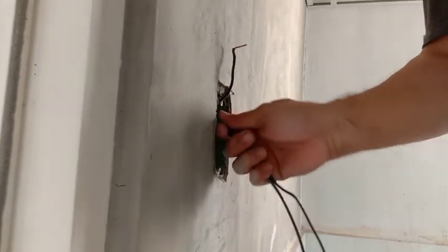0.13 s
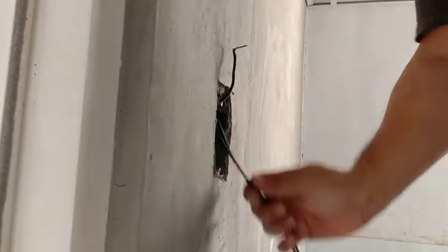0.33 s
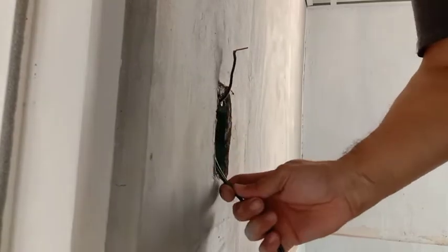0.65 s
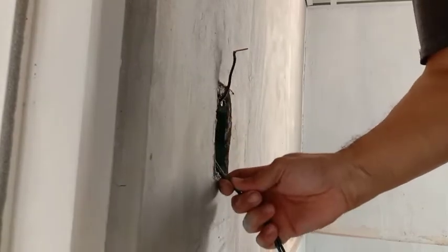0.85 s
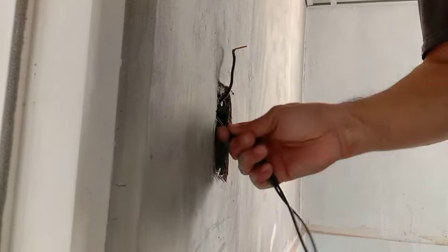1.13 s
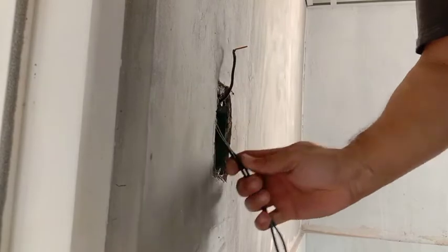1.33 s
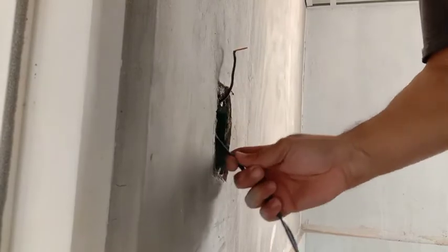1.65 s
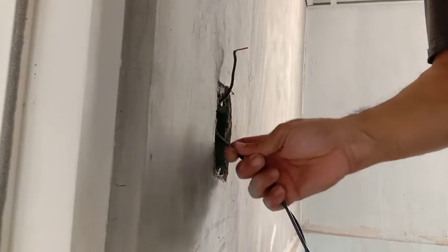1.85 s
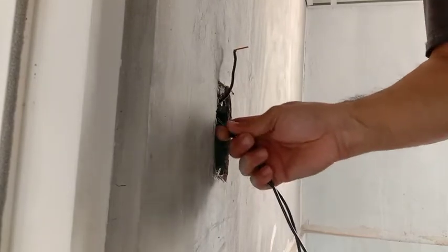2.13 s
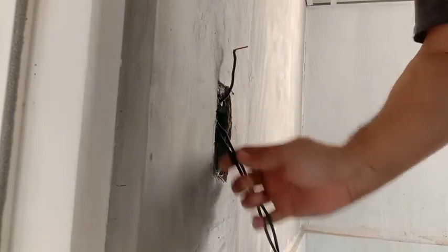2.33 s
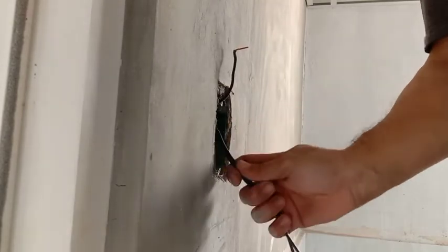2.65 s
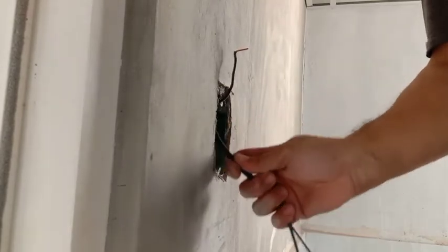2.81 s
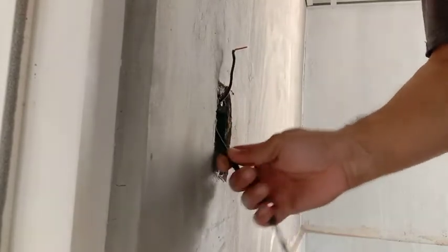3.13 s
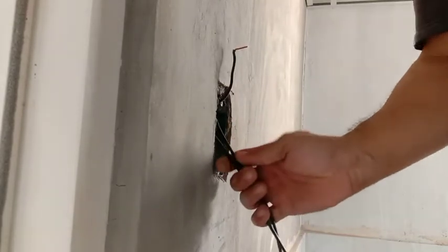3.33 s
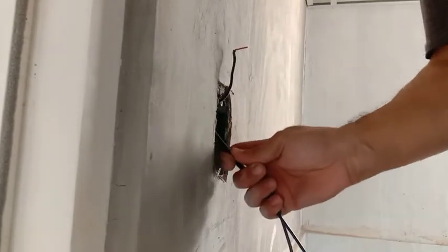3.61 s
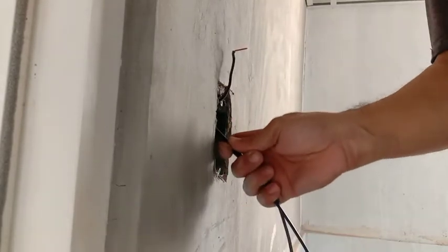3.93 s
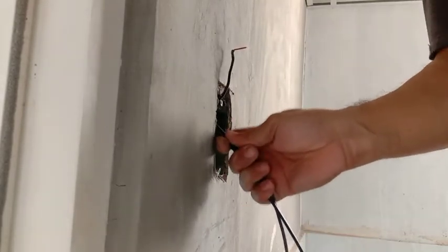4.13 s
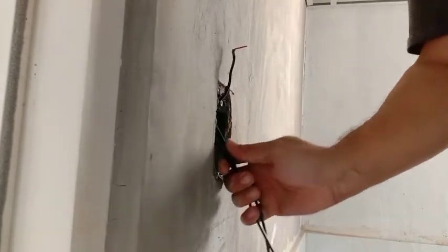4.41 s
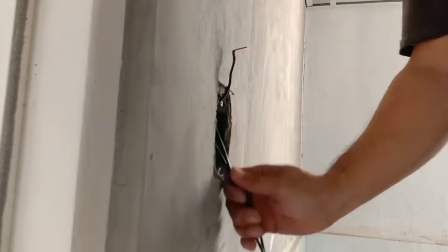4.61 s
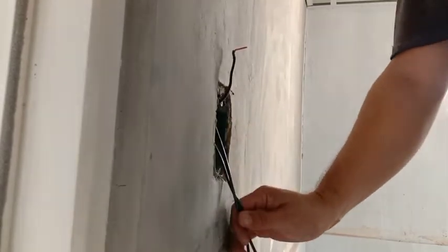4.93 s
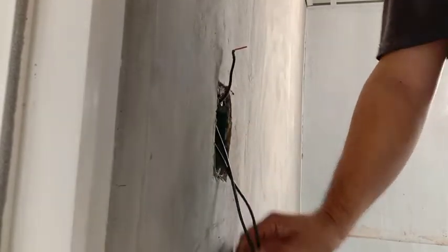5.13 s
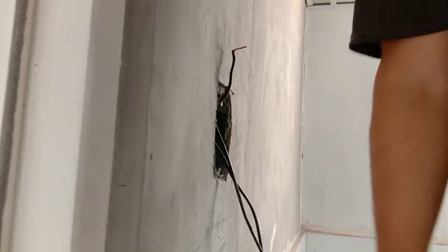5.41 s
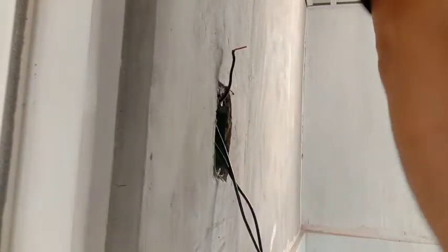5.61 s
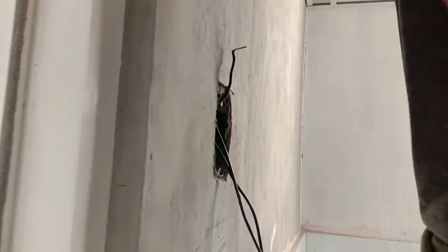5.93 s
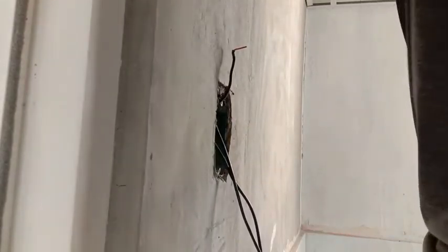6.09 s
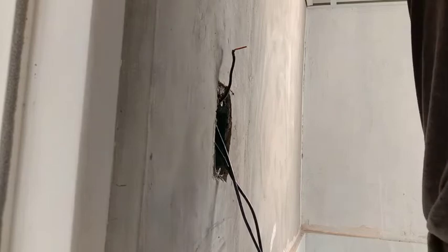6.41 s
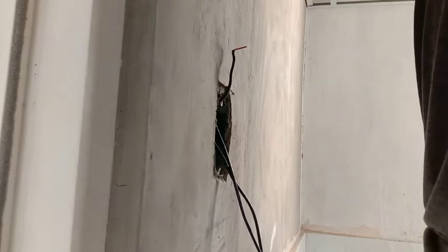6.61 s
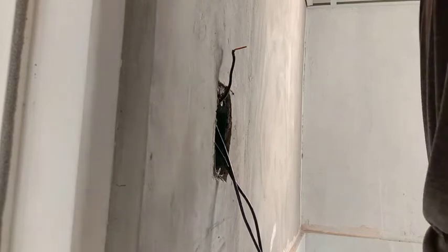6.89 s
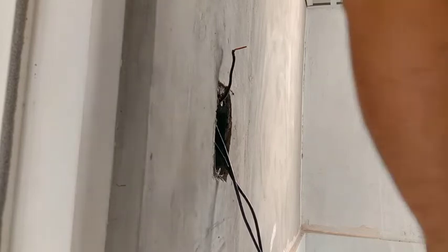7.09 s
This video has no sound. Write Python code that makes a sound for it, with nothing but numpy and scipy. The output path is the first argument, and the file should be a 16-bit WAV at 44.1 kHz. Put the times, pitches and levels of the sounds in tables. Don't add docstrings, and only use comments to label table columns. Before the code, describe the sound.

Stiff insulated wire is tugged through a plastic conduit in a bare echoing room, rasping, squeaking, and slapping pipe, plaster and steel box.

```python
import sys
import numpy as np
from scipy import signal
from scipy.fft import rfft, irfft, next_fast_len
from scipy.io import wavfile
from scipy.ndimage import uniform_filter1d, map_coordinates

SR = 44100
rng = np.random.default_rng(int(sys.argv[2]) if len(sys.argv) > 2 else 0)


def materialize(psi):
    bounded = np.clip(np.atleast_2d(psi).T, -1, 1)
    quanta = np.round(bounded * 32767).astype(np.int16)
    wavfile.write(sys.argv[1], SR, quanta)


def voltage_ratio(decibels):
    exponent = np.asarray(decibels, float) / 20
    return 10 ** exponent


N = 319989


def unit(x):
    return x / np.sqrt(np.mean(x ** 2) + 1e-20)


def along(points, hz):
    f, value = np.transpose(points)
    return np.interp(np.log(hz + 1), np.log(f + 1), value)


def curves(rows):
    s, *columns = np.transpose(rows)
    return [np.interp(np.arange(N) / SR, s, column) for column in columns]


def wobble(knots_per_s):
    knots = rng.standard_normal(int(N * knots_per_s / SR) + 4)
    return map_coordinates(knots, [np.arange(N) * knots_per_s / SR])


def filtered(x, response):
    m = next_fast_len(len(x) + 8192)
    return irfft(rfft(x, m) * response(np.fft.rfftfreq(m, 1 / SR)), m)[:len(x)]


def colour(spectrum):
    return lambda hz: voltage_ratio(along(spectrum, hz))


def resonant(modes):
    def mode(f, centre, width, db):
        return voltage_ratio(db) * 1j * f * width / (centre * centre - f * f + 1j * f * width)
    return lambda f: sum((-1) ** k * mode(f, *row) for k, row in enumerate(modes))


def patchy(x, depth_db, count):
    z = signal.stft(x, nperseg=1024)[2]
    field = uniform_filter1d(rng.standard_normal(z.shape), size=2, axis=0)
    field = uniform_filter1d(field, size=count, axis=1)
    return signal.istft(z * voltage_ratio(depth_db * unit(field)), nperseg=1024)[1][:len(x)]


def gritty(grain_db, flutter_db):
    slips = rng.standard_normal(N) * voltage_ratio(grain_db * wobble(900))
    return patchy(slips * voltage_ratio(flutter_db * wobble(35)), depth_db=3.6, count=16)


def fuzzy(phase, hz_wide):
    return wobble(hz_wide) * np.sin(phase) + wobble(hz_wide) * np.cos(phase)


GRIP_DB_PER_S, LET_GO_DB_PER_S = 295, 154


def efforts(starts, lengths, levels_db, rest_db, rise=GRIP_DB_PER_S, fall=LET_GO_DB_PER_S):
    t = np.arange(0, N + 32, 32)[:, None] / SR
    early_s = np.clip(starts - t, 0, None)
    late_s = np.clip(t - starts - lengths, 0, None)
    db = levels_db - rise * early_s - fall * late_s
    gain = np.sqrt(voltage_ratio(2 * rest_db) + voltage_ratio(2 * db).sum(axis=1))
    return np.interp(np.arange(N) / SR, t[:, 0], gain)


# f/Hz, t60/s
ROOM_T60 = [(300, 0.72), (1000, 0.54), (3000, 0.52), (6000, 0.43), (14000, 0.27)]


def room_tail(build_s, direct_db):
    modes = patchy(rng.standard_normal(SR * 3 // 4), depth_db=2.8, count=30)
    hz, t, z = signal.stft(modes, SR, nperseg=128)
    decay = voltage_ratio(-60 * t / along(ROOM_T60, hz)[:, None])
    tail = signal.istft(z * decay, SR, nperseg=128)[1]
    tail = tail * (1 - np.exp(-np.arange(len(tail)) / SR / build_s))
    tail[SR // 300] += voltage_ratio(direct_db)
    return tail


# f/Hz, level/dB per Hz
SNAP_COLOUR = [(4120, -16.5), (7000, 1.5), (7640, -11.5), (8230, -14), (9170, -1), (13500, -7),
               (14900, 2.5), (15900, -14), (16200, -56)]


def slaps(events, spectrum, modes, modes_db, ring_db, ring_hz_wide, build_s, direct_db):
    out = np.zeros(N + SR)
    head = slice(0, SR // 25)
    for s, db, ring_hz, bright_db, snap_db in events:
        wet = room_tail(build_s, direct_db)
        ring = resonant([(ring_hz, ring_hz_wide, ring_db)])

        def struck(hz):
            tilt_db = bright_db * np.log2((hz + 1) / 1500)
            ringing = 1 + ring(hz) + voltage_ratio(modes_db) * resonant(modes)(hz)
            return voltage_ratio(along(spectrum, hz) + tilt_db) * ringing

        body = filtered(wet, struck)
        snap = filtered(wet, colour(SNAP_COLOUR))
        hit = body / body[head].std() + voltage_ratio(snap_db + 8.5) * snap / snap[head].std()
        out[round((s - .005) * SR):][:len(hit)] += voltage_ratio(db - 9.5) * hit
    return out[:N]


# f/Hz, width/Hz, level/dB
PIPE_MODES = [(1255, 100, 0), (1560, 200, -9)]
# t/s, peak level/dB, ring f/Hz, brightness/dB per octave, snap level/dB
FIRST_TUG_HITS = [
    (0.093, -24.5, 870, 0.5, -50),
    (0.108, -31.5, 2400, 2.5, -52),
    (0.146, -34.5, 900, -4.5, -57),
]
# f/Hz, level/dB per Hz
HOLLOW_COLOUR = [(150, -67), (380, -22), (600, -6.5), (900, -3), (1500, -4), (2400, -1.5), (3500, -7.5),
                 (4800, -21.5), (6950, -34), (7800, -50), (10100, -65), (17200, -120)]


def first_tug():
    return slaps(FIRST_TUG_HITS, HOLLOW_COLOUR, PIPE_MODES, modes_db=-20, ring_db=6,
                 ring_hz_wide=250, build_s=0.0071, direct_db=-3)


# f/Hz, width/Hz, level/dB
BOX_MODES = [(950, 21, 10), (1283, 34, 0), (1527, 27, 4), (3040, 21, 4), (3420, 120, -1), (3400, 31, 6)]
# t/s, peak level/dB, ring f/Hz, brightness/dB per octave, snap level/dB
BOX_HITS = [
    (4.847, -15.5, 1050, 1, -38),
    (4.853, -8, 3040, -2, -30.5),
    (4.874, -18, 2710, 0, -32),
]
# f/Hz, level/dB per Hz
BOX_COLOUR = [(180, -69), (300, -70), (525, -11), (653, -25), (748, -2.5), (857, -17), (943, -0.5),
              (1050, -7.5), (1290, 1.5), (3130, -5), (4650, -3), (7800, -26.5), (10100, -73), (17200, -120)]
# t/s, peak level/dB, ring f/Hz, brightness/dB per octave, snap level/dB
RIM_HITS = [
    (6.544, -10, 3500, 1.5, -31),
    (6.55, -14.5, 3260, -1.5, -28),
]
# f/Hz, level/dB per Hz
RIM_COLOUR = [(240, -61), (400, -33), (754, -22.5), (950, -9.5), (1040, -21), (1220, 2), (1390, -14),
              (1570, -3), (1710, -5.5), (2610, -14), (3190, -0.5), (4040, -13.5), (5440, -12), (7800, -41),
              (10100, -73), (17200, -120)]


def box_slaps():
    side = slaps(BOX_HITS, BOX_COLOUR, BOX_MODES, modes_db=1.5, ring_db=11.0,
                 ring_hz_wide=300, build_s=0.00076, direct_db=17.5)
    rim = slaps(RIM_HITS, RIM_COLOUR, BOX_MODES, modes_db=5.5, ring_db=0.5,
                ring_hz_wide=398, build_s=0.0019, direct_db=-10.0)
    return side + rim


# t/s, peak level/dB, ring f/Hz, brightness/dB per octave, snap level/dB
CRACK_HITS = [
    (3.021, -10.5, 1420, 1, -23),
    (3.144, -21.5, 1490, -3, -32),
]
# f/Hz, level/dB per Hz
EDGE_COLOUR = [(240, -61.5), (400, -54), (574, -19), (864, -12.5), (931, -3.5), (1000, -18.5), (1290, -3),
               (1800, -6.5), (1990, -25), (2450, -20), (2750, -7), (2920, -3), (3840, -8.5), (4570, -8),
               (7800, -35), (10100, -46), (17200, -120)]


def edge_cracks():
    return slaps(CRACK_HITS, EDGE_COLOUR, PIPE_MODES, modes_db=-19, ring_db=2.0,
                 ring_hz_wide=100, build_s=0.0031, direct_db=2.0)


# t/s, peak level/dB, ring f/Hz, brightness/dB per octave, snap level/dB
THUD_HITS = [
    (1.165, -23.5, 950, 6.5, -52),
    (4.113, -23, 540, -3, -52),
]
# t/s, peak level/dB, ring f/Hz, brightness/dB per octave, snap level/dB
KNOCK_HITS = [
    (2.0575, -21, 892, 1.5, -55),
    (4.089, -15.5, 740, 5.5, -37.5),
]
# f/Hz, level/dB per Hz
DULL_COLOUR = [(150, -67), (250, -32), (380, -14.5), (552, -1), (1430, 5.5), (1650, 4), (2970, -3),
               (4320, -16), (4850, -10.5), (6950, -28.5), (7800, -50), (10100, -56), (17200, -120)]


def pipe_thuds():
    thuds = slaps(THUD_HITS, DULL_COLOUR, PIPE_MODES, modes_db=-13, ring_db=6,
                  ring_hz_wide=114, build_s=0.0048, direct_db=-1)
    knocks = slaps(KNOCK_HITS, DULL_COLOUR, PIPE_MODES, modes_db=-8, ring_db=13.5,
                   ring_hz_wide=115, build_s=0.0043, direct_db=5)
    return thuds + knocks


# t/s, peak level/dB, ring f/Hz, brightness/dB per octave, snap level/dB
FLOP_HITS = [
    (5.775, -18.5, 890, 3, -36),
    (5.795, -23, 780, -1, -40),
    (5.822, -24.5, 1310, 0.5, -42),
]
# f/Hz, level/dB per Hz
SLACK_COLOUR = [(180, -67), (300, -31.5), (554, -12), (610, 2), (699, -10), (917, -4), (1340, -4.5),
                (1890, -10.5), (2920, -11), (4650, -15.5), (7800, -41.5), (10100, -67), (17200, -120)]


def loop_flops():
    return slaps(FLOP_HITS, SLACK_COLOUR, PIPE_MODES, modes_db=-25.0, ring_db=7,
                 ring_hz_wide=100, build_s=0.0065, direct_db=-4)


# t/s, peak level/dB, ring f/Hz, brightness/dB per octave, snap level/dB
TICK_HITS = [(0.1797, -31, 2440, -3.5, -42), (0.6582, -53, 1320, -4, -35), (0.8188, -53.5, 1270, -3, -34),
             (0.9107, -26.5, 2660, 0, -30.5), (1.0288, -36.5, 2000, 0, -38), (1.1182, -24, 1400, 2, -22.5),
             (1.3289, -41, 1420, 5, -24), (2.5968, -34, 2040, -6, -48), (3.916, -39.5, 1790, 8.5, -30.5),
             (4.0193, -36, 3400, 2, -45), (4.03, -36, 3000, -4, -47), (4.461, -42.5, 2100, -9, -39.5),
             (4.475, -40, 2600, -8, -40), (5.254, -24, 3500, 5, -30), (5.257, -31.5, 1900, -4, -45),
             (5.4422, -28, 1860, 4, -32.5)]
# t/s, peak level/dB, ring f/Hz, brightness/dB per octave, snap level/dB
PING_HITS = [
    (1.4595, -31, 1260, -3, -42),
    (1.5594, -38.5, 1610, -5, -39),
    (2.0885, -23, 2950, -1, -43),
    (2.0965, -18.5, 2184, -3.5, -39),
    (2.2394, -29, 3035, -4.5, -32),
    (7.0134, -42, 1134, -4.5, -43),
]
# f/Hz, level/dB per Hz
BRIGHT_COLOUR = [(290, -74), (500, -12.5), (1020, -4.5), (1300, 0), (1610, -1.5), (1770, 2), (2530, -3),
                 (2770, 3), (3530, 0.5), (5460, -3), (7800, -37), (10100, -47), (17200, -120)]


def wall_ticks():
    loose = slaps(TICK_HITS, BRIGHT_COLOUR, PIPE_MODES, modes_db=-24, ring_db=4.5,
                  ring_hz_wide=330, build_s=0.0022, direct_db=-1)
    taut = slaps(PING_HITS, BRIGHT_COLOUR, PIPE_MODES, modes_db=-19, ring_db=12.0,
                 ring_hz_wide=123, build_s=0.0034, direct_db=3.0)
    return loose + taut


# t/s, peak level/dB, f/Hz
FLICKS = [(1.5615, -31, 2900), (1.3285, -39, 6700), (1.2, -23, 3060), (4.1135, -18.5, 2250),
          (3.0435, -14.5, 3100), (6.6135, -27, 3200), (0.307, -31, 2600), (5.797, -24, 1300),
          (5.829, -26, 1350)]


def clicks():
    out, t = np.zeros(N), np.arange(SR // 200) / SR
    for s, db, hz in FLICKS:
        cycles = t * hz
        envelope = voltage_ratio(db + 10 - 8.4 * cycles) * cycles
        out[round(s * SR):][:len(t)] += envelope * np.sin(2 * np.pi * cycles)
    return out


def wire_blows():
    in_pipe = first_tug() + pipe_thuds()
    on_wall = edge_cracks() + loop_flops() + wall_ticks()
    return in_pipe + box_slaps() + on_wall + clicks()


# start t/s, length/s, rasp level/dB, drag over rasp/dB, fizz over rasp/dB
TUGS = [(0.147, 0.29, -46, -11.5, -32), (.96, 0.044, -47.5, -10, -39), (1.135, .15, -43, -3, -22),
        (1.33, 0.11, -58.5, -4, -17.5), (1.568, 0.022, -44.5, -22, -33), (1.9, 0.1, -71.5, 8, -12),
        (2.138, 0.11, -37.5, -15, -23.5), (2.304, 0.13, -55.5, -2, -42), (2.473, 0.11, -65, 8.5, -22.5),
        (2.58, 0.37, -55, -1.5, -22), (3.162, 0.033, -33, -14.5, -40.5), (3.243, 0.07, -40.5, -8.5, -23.5),
        (3.432, .12, -36, -11.5, -26), (3.656, 0.054, -57.5, -1, -45), (3.754, 0.3, -51.5, -1.5, -19.5),
        (4.24, 0.12, -52, -8, -27), (4.485, 0.19, -48.5, -6, -17), (5.052, 0.21, -48.5, -3.5, -22),
        (5.459, 0.14, -59, -6, -17), (5.853, .06, -45.5, -2.5, -37), (6.016, 0.13, -56, 4, -22),
        (6.227, 0.29, -48, -5, -24.5), (6.69, 0.11, -44.5, -1, -24.5), (6.83, 0.11, -54.5, 1.5, -14),
        (6.98, 0.077, -58, 1.5, -25)]
# rasp level/dB, drag level/dB, fizz level/dB
CREEP_DB = (-70, -64, -85)
# f/Hz, level/dB per Hz
RASP_COLOUR = [(880, -47), (1500, -9.5), (1820, -1.5), (2000, -7), (2190, -2), (2420, -3.5), (3730, -5.5),
               (4290, -14.5), (5370, -11), (8000, -46), (10400, -57), (17600, -120)]
DRAG_COLOUR = [(180, -42), (300, -22), (653, -10.5), (893, -9.5), (1060, -12), (1200, -5.5), (1560, -16),
               (2640, -120)]
FIZZ_COLOUR = [(4410, -36), (7500, -6), (8100, -22), (9580, -7.5), (13500, -13.5), (14800, -2), (15200, -2),
               (15900, -3), (16200, -43)]
# start t/s, length/s, level/dB
PIPE_TONES = [(0, 0.015, -54.5), (.22, 0.22, -55), (1.14, .1, -54), (1.448, 0.15, -52.5),
              (2.14, 0.024, -38.5), (2.515, 0.059, -47.5), (2.678, 0.06, -51), (2.927, .16, -49.5),
              (3.397, 0.16, -44.5), (3.65, 0.42, -59), (4.44, 0.3, -54.5), (4.99, 0.34, -47),
              (5.4, 0.16, -54.5), (5.6, 0.18, -68), (5.924, 0.055, -49), (6.17, 0.36, -53.5),
              (6.68, 0.076, -42.5), (6.85, 0.29, -54)]
PIPE_REST_DB, FIZZ_STOPS_DB_PER_S = -69, 306


def scrape():
    s, length, rasp_db, drag_db, fizz_db = np.transpose(TUGS)
    rasp = filtered(gritty(grain_db=1.5, flutter_db=.8), colour(RASP_COLOUR))
    drag = filtered(gritty(grain_db=1.5, flutter_db=1.5), colour(DRAG_COLOUR))
    fizz = filtered(gritty(grain_db=1, flutter_db=.7), colour(FIZZ_COLOUR))
    breath = rng.standard_normal(N) * voltage_ratio(1.6 * wobble(30))
    pipe = filtered(breath, lambda hz: resonant(PIPE_MODES)(hz) ** 2)

    rasp_rest, drag_rest, fizz_rest = CREEP_DB
    out = efforts(s, length, rasp_db, rasp_rest) * unit(rasp)
    out += efforts(s, length, rasp_db + drag_db, drag_rest) * unit(drag)
    out += efforts(s, length, rasp_db + fizz_db, fizz_rest, fall=FIZZ_STOPS_DB_PER_S) * unit(fizz)
    return out + efforts(*np.transpose(PIPE_TONES), PIPE_REST_DB) * unit(pipe)


# centre t/s, half length/s, f/Hz, width/Hz, level/dB
STICK_SLIPS = [(1.62, .06, 1660, 149, -53.5), (1.96, 0.11, 5300, 800, -66.5),
               (2.18, 0.047, 200, 90.3, -54.5), (2.625, 0.034, 725, 69.95, -42),
               (2.66, .05, 4100, 300, -64), (2.72, 0.053, 749, 100, -47.5), (2.72, 0.15, 1435, 60.2, -55.5),
               (2.71, 0.07, 1744, 79.7, -50), (4.05, .035, 2240, 150, -48), (4.5, 0.046, 2110, 200, -49),
               (4.49, .03, 3250, 200, -53.5), (2.7, .12, 3264, 300, -57), (2.92, 0.035, 3280, 200, -59),
               (1.13, 0.023, 1400, 150, -41), (1.13, 0.017, 4700, 300, -48), (1.58, .03, 1564, 150, -48),
               (3.47, 0.064, 2175, 120, -38.5), (3.52, 0.14, 534, 89.2, -56),
               (3.95, 0.076, 530, 79.7, -56.5), (4.79, 0.087, 5140, 900, -69.5),
               (4.96, 0.14, 210, 89.5, -60), (1.55, 0.13, 140, 40.1, -59), (5.32, 0.095, 150, 49.9, -58),
               (5.72, 0.15, 4980, 690, -66.5), (6.7, 0.15, 300, 30, -61), (6.99, 0.09, 1198, 90, -48.5)]
# centre t/s, half length/s, f/Hz, width/Hz, level/dB
BEND_RUBS = [
    (6.3, 0.13, 1310, 128.5, -53.5),
    (6.35, 0.13, 1590, 109.7, -50),
    (6.49, .05, 1600, 80, -56),
]
BEND_RISES_HZ_PER_S = 450


def squeaks():
    t = np.arange(N) / SR
    out = np.zeros(N)
    for rows, glide in ((STICK_SLIPS, 0), (BEND_RUBS, BEND_RISES_HZ_PER_S)):
        for s, half_s, hz, hz_wide, db in rows:
            swell = np.exp(-((t - s) / half_s) ** 4)
            phase = 2 * np.pi * (hz * t + glide * (t - s) ** 2 / 2)
            out += voltage_ratio(db) * swell * fuzzy(phase, hz_wide)
    return out


# t/s, shaft f/Hz, level/dB
TOOL_RUN = [(2.48, 945, -57), (2.52, 957, -49), (2.66, 958, -58), (2.78, 940, -51), (2.92, 950, -53.5),
            (3.05, 940, -48), (3.3, 890, -55), (3.42, 895, -47), (3.52, 905, -43), (3.6, 895, -43.5),
            (3.66, 875, -42.5), (3.7, 870, -47), (3.74, 860, -43), (3.82, 865, -53.5), (3.95, 868, -55),
            (4.02, 860, -68)]
# start t/s, length/s, level/dB
FIRST_ORDER = [
    (2.75, 0.47, 0.5),
    (3.626, 0.17, -11),
]
FIRST_WEAK_DB, STUTTER_DB = -9, 1.6


def tool():
    hz, level_db = curves(TOOL_RUN)
    phase = 2 * np.pi * np.cumsum(hz * (1 + .006 * wobble(22))) / SR
    on_s, off_s = TOOL_RUN[0][0], TOOL_RUN[-1][0]
    running, = curves([(on_s - .05, 0), (on_s, 1), (off_s, 1), (off_s + .05, 0)])
    first = 1.1 * np.sin(phase) + .5 * fuzzy(phase, hz_wide=50)
    second = .4 * np.sin(2 * phase) + .9 * fuzzy(2 * phase, hz_wide=130)
    share = efforts(*np.transpose(FIRST_ORDER), FIRST_WEAK_DB)
    return running * voltage_ratio(level_db + STUTTER_DB * wobble(30)) * (share * first + second)


# start t/s, length/s, level/dB
RUMBLE_SWELLS = [(0, 0.68, -65), (1, 0.6, -58.5), (2.152, 0.11, -57), (2.55, 2, -68), (4.03, 0.3, -61.5),
                 (4.5, 0.16, -73), (4.828, 0.064, -58), (5.22, 0.3, -60.5), (5.814, 0.14, -56.5),
                 (6.0, 0.48, -63.5), (6.518, 0.34, -56)]
# f/Hz, level/dB per Hz
RUMBLE_COLOUR = [(15, -44), (25, -37.5), (49, -7), (70, -12.5), (125, -1), (152, -2), (243, -10), (274, -9),
                 (298, -15), (404, -10), (450, -15.5), (580, -15), (990, -120)]
# start t/s, length/s, level/dB
HUM_SWELLS = [(.05, 0.11, -62), (.52, 0.091, -63.5), (1.0, 0.088, -63), (1.35, 0.35, -58.5),
              (1.84, 0.11, -69), (2.14, .1, -57.5), (2.57, .06, -64.5), (3.15, 0.43, -59.5),
              (4.2, 0.061, -63), (4.52, 0.059, -61), (5.2, 0.13, -58.5), (5.8, .14, -62), (6.2, .12, -68.5),
              (6.5, 0.057, -63)]
# f/Hz, width/Hz
HUM_MODE = (82, 7.6)
SWELL_DB_PER_S, FADE_DB_PER_S = 126, 74
RUMBLE_REST_DB, HUM_REST_DB, HUM_SWING_DB = -66, -72.5, 3


def rumble():
    hum_hz, hum_hz_wide = HUM_MODE
    phase = 2 * np.pi * hum_hz * np.arange(N) / SR
    hum_gain = efforts(*np.transpose(HUM_SWELLS), HUM_REST_DB, SWELL_DB_PER_S, SWELL_DB_PER_S)
    hum_gain = hum_gain * voltage_ratio(HUM_SWING_DB * wobble(9))
    hum = hum_gain * (1.04 * np.sin(phase) + 0.57 * fuzzy(phase, hum_hz_wide))

    level = efforts(*np.transpose(RUMBLE_SWELLS), RUMBLE_REST_DB, SWELL_DB_PER_S, FADE_DB_PER_S)
    noise = filtered(rng.standard_normal(N), colour(RUMBLE_COLOUR))
    lumpy = unit(voltage_ratio(3.1 * wobble(6)) * noise)
    return hum + level * voltage_ratio(0.5) * lumpy


def scene():
    return (wire_blows() + scrape() + squeaks() + tool() + rumble())[None]


def band_limit(x):
    return signal.sosfilt(signal.butter(12, 16810, fs=SR, output="sos"), x)


def record(dry):
    top_hz, bass_hz = 15680, 30
    band = lambda hz: (hz < top_hz) * hz ** 2 / (hz ** 2 + bass_hz ** 2)
    mix = filtered(dry[0], band)[None]
    return band_limit(mix)


dry = scene()
out = record(dry)
materialize(out)
```